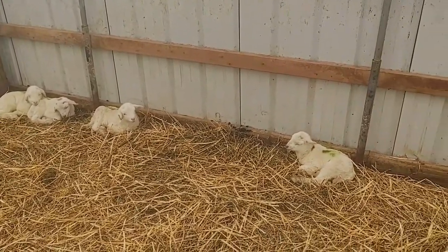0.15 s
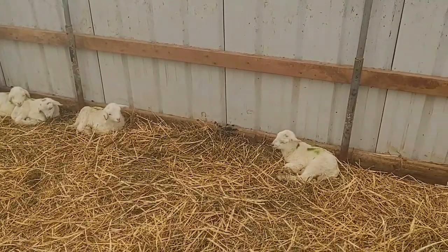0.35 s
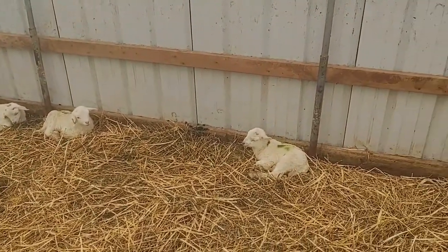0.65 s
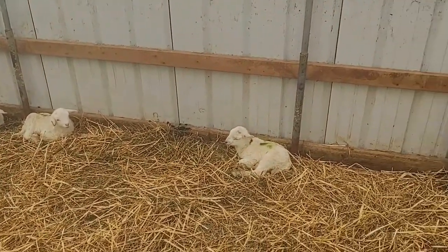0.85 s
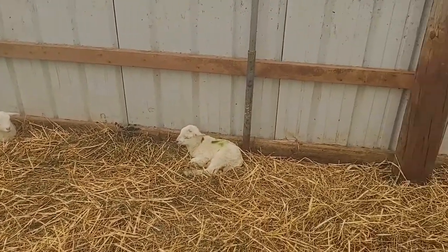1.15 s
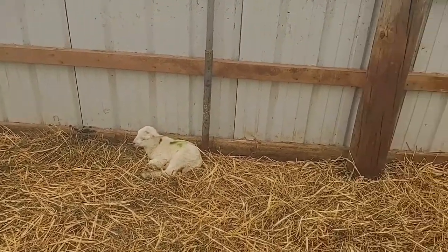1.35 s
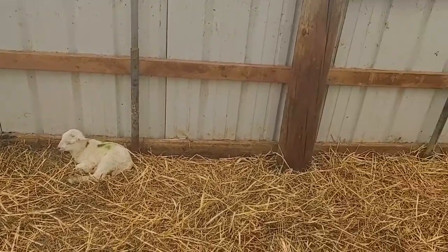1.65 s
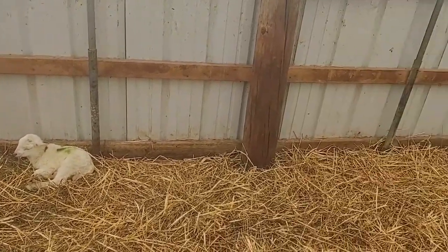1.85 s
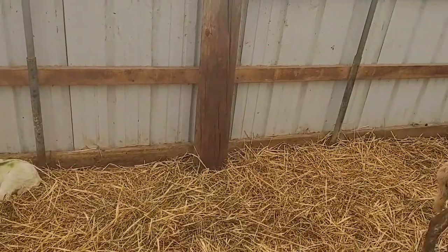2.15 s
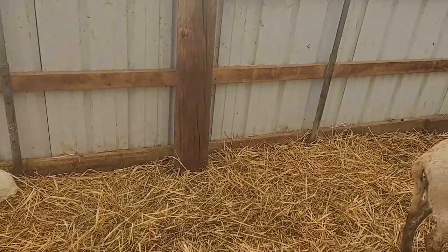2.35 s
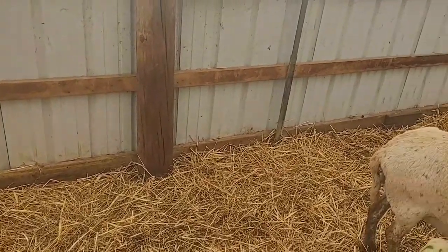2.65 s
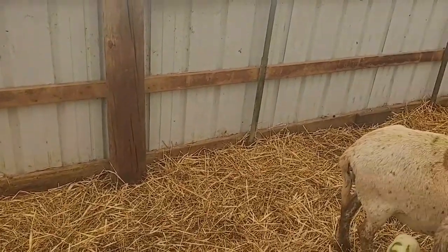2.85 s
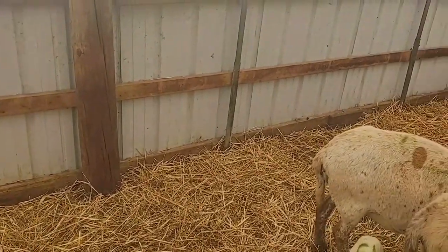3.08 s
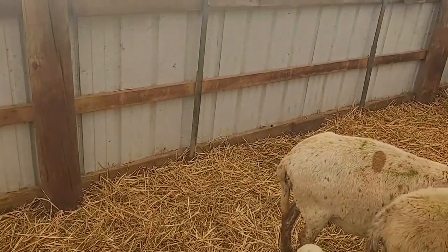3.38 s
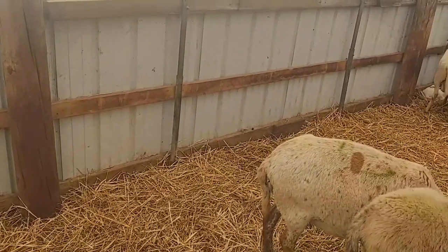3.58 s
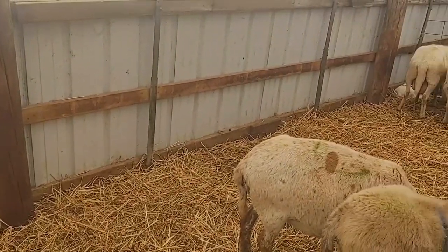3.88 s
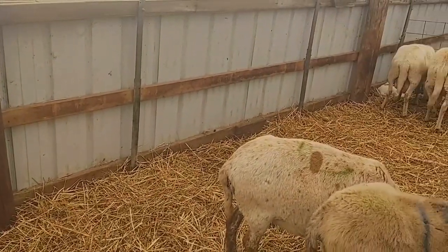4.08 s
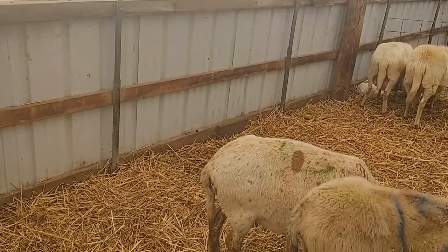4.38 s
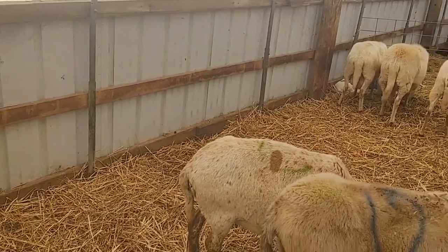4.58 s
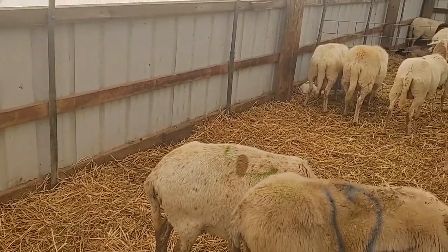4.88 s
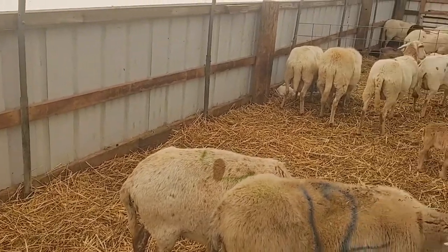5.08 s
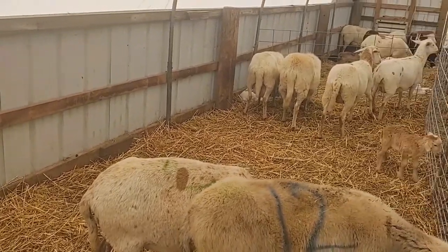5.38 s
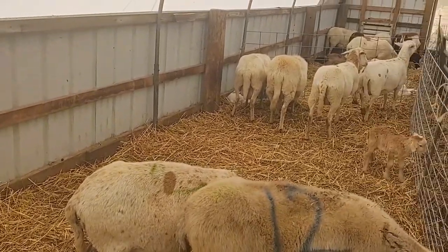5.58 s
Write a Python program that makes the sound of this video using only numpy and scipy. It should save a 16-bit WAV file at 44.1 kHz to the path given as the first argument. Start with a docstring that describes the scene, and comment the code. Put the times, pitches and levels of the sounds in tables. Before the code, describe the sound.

Inside a sheet-metal barn with straw bedding, a handheld phone picks up thin, bright stereo sound. Faint still air and a very low rumble lie underneath. From the start, footsteps brush and crush dry straw about twice a second, crisp and grainy, with a sharp stalk snap at 0.6 s. The steps are fullest from roughly 0.5 to 2.8 s, then lighter, with another small snap near 3.2 s and faint ticks around 4.7 and 5.4 s. At about 1.7 s a sheep makes a throbbing, creaky closed-mouth grumble that opens at 2.0 s into a loud, nasal, rasping bleat, fluttering at first and sharpening before stopping near 2.5 s, with short echoes. A softer grumble at 3.5 s leads to a brief, quavering, more distant bleat from 3.9 to 4.15 s. Steps continue, and at 5.5 s a third grumble swells into a rough call from about 5.7 s, just as things end.

```python
"""Sheep bleat in a sheet-metal barn while someone walks through the straw bedding with a phone.
Each call starts as a closed-mouth grumble of creaking vocal folds and opens into a rasping bleat, fold
pulses ringing in nose and throat: a loud near one, a softer quavering one further off, the start of a third.
Steps crush the straw throughout as shaped noise with a few snapping stalks, over still air and a low rumble."""
import sys
import numpy as np
from scipy import signal
from scipy.fft import rfft, irfft
from scipy.io import wavfile
from scipy.ndimage import uniform_filter1d

SR = 44100
rng = np.random.default_rng(int(sys.argv[2]) if len(sys.argv) > 2 else 0)


def generate_wav(signal):
    """Clip the signal to [-1, 1] and save it as 16-bit WAV at the path in sys.argv[1]."""
    frames = np.transpose(np.atleast_2d(signal))
    scaled = np.clip(frames, -1, 1) * 32767
    pcm = np.round(scaled).astype(np.int16)
    wavfile.write(sys.argv[1], SR, pcm)


N = 252693
TIME = np.arange(N) / SR


def undb(db):
    """Decibels to gain."""
    return 10 ** (np.asarray(db) / 20)


def curves(rows):
    """Each column of a table, joined by straight lines in time."""
    s, *columns = np.transpose(rows)
    return [np.interp(TIME, s, c) for c in columns]


def unit(x):
    """Scale to rms 1."""
    return x / np.sqrt(np.mean(x ** 2) + 1e-18)


def steady(x, seconds=0.36):
    """Scale to a running rms of 1, keeping the fast flutter."""
    power = np.abs(uniform_filter1d(x ** 2, int(seconds * SR)))
    return x / np.sqrt(power + 1e-18)


def gate(start, end, fade_s=0.0111):
    """1 while a sound lasts, with short fades."""
    fade_in = np.clip((TIME - start) / fade_s, 0, 1)
    return fade_in * np.clip((end - TIME) / fade_s + 1, 0, 1)


def walk(rate):
    """Smooth random drift, spread near 1, from fresh values drawn rate times a second."""
    k = int(SR / rate)
    held = np.repeat(rng.standard_normal(N // k + 1), k)
    return 1.22 * uniform_filter1d(uniform_filter1d(held, k), k)[:N]


def colour(x, points, share=1):
    """Filter by a spectrum of (frequency [Hz], level [dB]) points, its decibels scaled by share."""
    hz, db = np.transpose(points)
    f = np.arange(N + 1) * SR / (2 * N)
    gain = undb(share * np.interp(np.log(f + 1), np.log(hz), db))
    return irfft(rfft(x, 2 * N) * gain)[..., :N]


def resonate(x, hz, width):
    """A resonance applied twice, for steep skirts."""
    b, a = signal.iirpeak(min(hz, .45 * SR), hz / width, fs=SR)
    return signal.lfilter(b, a, signal.lfilter(b, a, x))


def throat(x, modes, order=2):
    """Resonances of the vocal tract as one causal filter; a higher order gives steeper skirts."""
    f = np.arange(1, 2050) * SR / 4096
    power = 0
    for hz, width, db in modes:
        detuning = (f / hz - hz / f) * hz / width
        power = power + undb(2 * db) / (1 + detuning ** 2) ** order
    # the folded cepstrum gives the minimum-phase response
    cepstrum = irfft(np.log(power + 1e-8))[:2048]
    cepstrum[0] /= 2
    response = irfft(np.exp(rfft(cepstrum, 4096)))
    return signal.oaconvolve(x, response)[:N]


# still air of the barn: (frequency [Hz], level per Hz [dB])
BARN_AIR = [(18, -45.5), (30, -8.5), (90, -9), (123, -7.5), (208, -9.5), (1450, -13), (1880, -13),
            (2440, -6.5), (3260, -11), (4830, -8), (6110, -9), (7340, -20), (9050, -17.5), (14100, -16.5),
            (15700, -6.5)]


def background(air_db=-61, rumble_db=-75, waver_db=2):
    """Still air of the barn with a low, wavering rumble that is alike at both ports."""
    air = unit(colour(rng.standard_normal((2, N)), BARN_AIR)) * undb(air_db)
    rumble = unit(throat(rng.standard_normal(N), [(118, 64, 1.5), (220, 300, -7)]))
    return air + rumble * undb(rumble_db + waver_db * walk(15))


# steps in the straw, about two a second, levels before each layer's trim: (heel down [s], pressing for [s],
# brushing beforehand for [s], crush [dB], crisp top [dB], dull crunch [dB])
STEPS = [(.19, 0.11, .19, -59.5, -54.5, -72), (.58, 0.14, 0.042, -52, -51, -82),
         (1.072, 0.19, 0.11, -51, -52.5, -80), (1.592, 0.14, 0.11, -51.5, -50.5, -67),
         (2.07, .44, 0.092, -49.5, -50.5, -50), (2.679, 0.14, 0.17, -49.5, -51, -52.5),
         (3.099, .16, 0.24, -56, -58, -60.5), (3.44, .14, 0.047, -55.5, -59.5, -80),
         (3.88, 0.098, 0.12, -62, -71, -62.5), (4.11, 0.083, 0.051, -57, -58.5, -73),
         (4.6, 0.14, .04, -65, -60.5, -82.5), (4.98, 0.2, 0.021, -58, -58, -66.5),
         (5.54, 0.13, 0.14, -58, -58, -62)]
# the weight comes on and lifts exponentially, with these time constants
STEP_RISE_S, STEP_FALL_S = .05, .042
# the swinging foot brushes the stalks, the heel lands, the load eases until the toe pushes off
BRUSH_DB, ROLL_DIP_DB = -5, -0.5


def footfalls():
    """Strength of crush, crisp top and dull crunch: each step brushes, presses from heel to toe and lifts."""
    def rise(start):
        return np.exp(np.minimum(TIME - start, 0) / STEP_RISE_S)

    power = 0
    for down, length, brushing, *db in STEPS:
        landing = np.maximum(rise(down), undb(BRUSH_DB) * rise(down - brushing))
        pressed = np.clip((TIME - down) / length, 0, 1)
        roll = undb(ROLL_DIP_DB * np.sin(np.pi * pressed) ** 2)
        lift = np.exp(-np.maximum(TIME - down - length, 0) / STEP_FALL_S)
        power = power + (undb(db)[:, None] * landing * roll * lift) ** 2
    return np.sqrt(power)


# rubbing and cracking stalks: (frequency [Hz], level per Hz [dB])
STRAW = [(290, -46), (500, -29.5), (658, -31), (877, -17), (1450, -21), (1830, -18), (2550, -11.5),
         (3350, -14.5), (4160, -12.5), (5550, -7), (6140, -2.5), (7960, -1.5), (9200, 0.5), (14000, -6),
         (15700, -9)]
# between steps the stalks keep settling, less and less; level before each layer's trim
SETTLING_DB, SETTLING_DB_PER_S = -64, -1


def straw(crackle_db=1.5, body_db=-3, crush_db=2, crisp_db=1, settling_top_db=-3):
    """Countless stalks rub and crack under each step; dry ones add a crisp top, packed bedding a duller crunch."""
    crush, crisp, weight = footfalls()
    settling = undb(SETTLING_DB + SETTLING_DB_PER_S * TIME)
    noise = rng.standard_normal((2, N))
    # a new random strength every 16 samples makes the noise grainy
    strength = np.repeat(rng.exponential(size=N // 16 + 1), 16)[:N].clip(0, 5)
    rustle = unit(colour(noise * undb(crackle_db * strength), STRAW))
    body = signal.sosfiltfilt(signal.butter(4, 5500, fs=SR, output="sos"), rustle)
    top = signal.sosfiltfilt(signal.butter(4, 11500, "high", fs=SR, output="sos"), rustle)
    middle = rustle - body - top
    patchy_db = 1.3 * walk(7)
    flicker_db = .9 * walk(60) + 1.1 * walk(18)
    crushed = body * undb(body_db + patchy_db) + middle
    crushing = unit(crushed) * np.hypot(crush, settling) * undb(crush_db)
    crackling = unit(top) * np.hypot(crisp, settling * undb(settling_top_db)) * undb(crisp_db)
    crunch = colour(rng.standard_normal((2, N)), [(60, -14), (150, -3.5), (500, -6.5), (1500, 0),
                                                  (3200, 7), (5500, -4), (6400, 6.5), (8500, -22)])
    return (crushing + crackling + unit(crunch) * weight) * undb(flicker_db)


# single stalks snapping: (time [s], peak level [dB], pitch [Hz])
SNAPS = [(0.6013, -29, 9800), (1.2284, -72, 10300), (3.2454, -32, 8750), (4.6398, -44, 11920),
         (4.7124, -39, 11500), (4.7855, -45.5, 11940), (5.4286, -44.5, 9170)]


def snaps(ring_s=0.0018, width_hz=7000):
    """A stalk breaks with a short bright tick: a dying noise burst through a broad resonance."""
    out = np.zeros((2, N))
    for s, db, hz in SNAPS:
        decay = np.exp(-np.abs(TIME - s) / ring_s) * (TIME >= s)
        tick = resonate(rng.standard_normal((2, N)) * decay, hz, width_hz)
        out += tick / np.abs(tick).max() * undb(db)
    return out


def folds(hz, rough, jitter, shimmer_db, rasp, limp_db=0):
    """Vocal folds: a click per closure, uneven, alternately strong and weak, each with a burst of turbulence."""
    phase = np.cumsum(hz) / SR
    chance = rng.standard_normal((2048, 2))
    cycle = np.arange(1, int(phase[-1]) - 1)
    unsteady = np.interp(cycle, phase, rough)
    # jitter is in cycles, shimmer and limp in dB, all in proportion to the roughness
    jittered = cycle + jitter * unsteady * chance[cycle, 0]
    at = np.sort(np.interp(jittered, phase, np.arange(N)).clip(0, N - 2))
    size = undb(unsteady * (shimmer_db * np.tanh(chance[cycle, 1]) + limp_db * (cycle % 2)))
    # each click is shared between its two nearest samples
    whole, part = at.astype(int), at % 1
    clicks = np.bincount(whole, size * (1 - part), N) + np.bincount(whole + 1, size * part, N)
    fade = np.exp(-1 / (0.0017 * SR))
    bursts = signal.lfilter([1], [1, -fade], clicks)
    air = unit(bursts * rng.standard_normal(N))
    return unit(clicks), rasp * rough * air


def barn(x, wet_db, t60=0.2, tail_db=-31, tail_t60=0.94):
    """Near metal walls give dense early echoes; the straw soaks up all but a faint tail."""
    t = TIME[:SR]
    early, tail = undb(-60 * t / t60), undb(tail_db) * undb(-60 * t / tail_t60)
    decay = (early + tail) * np.clip(t / 0.0053 - .5, 0, 1)
    echoes = rng.standard_normal((3, SR)) * decay / np.sqrt(np.sum(decay ** 2))
    wet = signal.fftconvolve(x[None], echoes, axes=1)[:, :N]
    # long waves reach both ports alike
    shared = signal.sosfilt(signal.butter(2, 700, fs=SR, output="sos"), wet[2])
    apart = signal.sosfilt(signal.butter(2, 700, "high", fs=SR, output="sos"), wet[:2])
    return undb(wet_db) * (0.75 * shared + apart)


# a grumble comes in throbs, the first just after its start
THROB_HZ, THROB_LAG_S, THROB_DB = 9.64, 0.037, 5


def grumble(start, end, nasal, throaty, ring, growth, ring_growth,
            nose_hz, nose_width_hz, pulse_hz, creak, wet_db=-2):
    """Mouth shut, the folds creak in slow, irregular pulses through nose and throat; they throb and grow."""
    to_go = np.clip((end - TIME) / (end - start), 0, 1)
    throb = THROB_DB * np.sqrt(to_go) * np.cos(2 * np.pi * THROB_HZ * (TIME - start - THROB_LAG_S))
    clicks, air = folds(np.full(N, pulse_hz), np.ones(N), jitter=0.21, shimmer_db=4.5, rasp=1.0)
    # turbulence at the slack folds fills the gaps between the pulses
    hoarse = creak * (clicks + air) + rng.standard_normal(N)
    nose = steady(resonate(hoarse, nose_hz, nose_width_hz))
    vowel = steady(throat(hoarse, [(560, 250, -2), (950, 870, 0.5), (1400, 500, -13.5)]))
    bright = steady(throat(creak * clicks + .4 * hoarse, [(2490, 1200, 0.0074)], order=6))
    sound = nose * undb(nasal - growth * to_go)
    sound += vowel * undb(throaty - 1.2 * growth * to_go)
    sound += bright * undb(ring - ring_growth * to_go)
    sound *= gate(start, end) * undb(throb)
    return sound + barn(sound, wet_db)


def place(x, lag_ms):
    """The sound reaches the left port lag_ms after the right."""
    return np.array([np.interp(TIME - lag_ms / 1000, TIME, x), x])


ATTACK_DB, SWELL_S = 15, .13
RELEASE_S, MOUTH_FALL_DB_PER_S, RING_FALL_DB_PER_S = .06, 142.5, 289


def bleat(row, hz, rough, nose_modes, mouth_modes, ring_modes, edge_modes, hum_quaver_db, mouth_quaver_db,
          flutter_db, flutter_s, vibrato, push, hum_fall, jitter, shimmer_db, limp_db, rasp,
          wet_db, ring_wet_db, lag_ms):
    """Fold pulses sound through nose and throat; effort swells and lets go, a quaver shakes pitch and level."""
    start, end, attack_s, hum, mouth, ring, edge, swell, quaver_hz, crest = row
    age, over = np.maximum(TIME - start, 0), np.maximum(TIME - end, 0)
    attack = ATTACK_DB * np.clip((TIME - start) / attack_s, -1, 0)
    effort = attack - swell * np.exp(-age / SWELL_S)
    quaver = np.cos(2 * np.pi * quaver_hz * (TIME - crest))
    flutter = flutter_db * quaver * np.exp(-age / flutter_s)
    clicks, air = folds(hz * (1 + vibrato * quaver), np.clip(rough * np.ones(N), 0, 1),
                        jitter, shimmer_db, rasp, limp_db)
    # levels in dB: effort weighs most on the raspy edge, least on the nose
    nose_db = hum + 0.69 * effort + hum_quaver_db * quaver - hum_fall * over
    vowel_db = mouth + 1.4 * effort + mouth_quaver_db * quaver - MOUTH_FALL_DB_PER_S * over
    bright_db = ring + 1.27 * effort + flutter - RING_FALL_DB_PER_S * over
    rasping_db = edge + 2.1 * effort + flutter + push - 2.7 * RING_FALL_DB_PER_S * over
    nose = steady(throat(clicks + 2 * air, nose_modes)) * undb(nose_db)
    vowel = steady(throat(clicks + .9 * air, mouth_modes)) * undb(vowel_db)
    bright = steady(throat(clicks + .5 * air, ring_modes, order=6)) * undb(bright_db)
    rasping = steady(throat(clicks + 4 * air, edge_modes)) * undb(rasping_db)
    # the low nasal hum sends only half its strength into the echo; the ring is beamed and has its own share
    spread = .5 * nose + vowel + rasping + undb(ring_wet_db) * bright
    voiced = gate(start - attack_s, end + RELEASE_S)
    return place(voiced * (nose + vowel + bright + rasping), lag_ms) + barn(voiced * spread, wet_db)


# closed-mouth grumbles that grow into the bleats, levels at their end: (start [s], end [s], nasal [dB],
# throaty [dB], ring [dB], growth [dB], ring growth [dB], nose [Hz], nose width [Hz], pulses [Hz], creak [0-1])
GRUMBLES = [(1.667, 2.002, -49.5, -58.5, -48.5, 26, 30.5, 176, 68, 80, 0.77),
            (3.494, 3.896, -58, -59.5, -59.5, 9, 17.5, 196, 151, 109.6, 0.25),
            (5.495, 5.762, -56.5, -64, -46.5, 16, 39.5, 179, 86, 79.9, 0.37)]
# bleats, loud, soft and late, levels before effort and quaver: (full voice from [s], letting go at [s],
# attack [s], nasal hum [dB], open mouth [dB], bright ring [dB], raspy edge [dB], swell [dB],
# quaver [Hz], a quaver crest [s])
BLEATS = [(2.028, 2.49, 0.049, -49, -34, -19.5, -38, 7, 11.96, 1.934),
          (3.915, 4.135, 0.048, -54, -42.5, -35.5, -59, 2.5, 11.5, 4.017),
          (5.715, 5.95, .045, -53.5, -38.5, -27.5, -35.5, 9, 8.8, 5.735)]
# vocal folds in the loud call: (time [s], pitch [Hz], roughness [0-1])
LOUD_FOLDS = [(2.0, 146, 0.7), (2.04, 147.6, 0.33), (2.09, 130.6, .55), (2.156, 127.1, .55),
              (2.262, 153.2, 0.46), (2.3, 148, .33), (2.336, 151.7, 0.4), (2.462, 148.9, 0.14),
              (2.51, 133.8, 0.27), (2.545, 124.6, 0.48)]
# resonances of nose, open mouth, bright ring and raspy edge, the late mouth half open:
# (frequency [Hz], width [Hz], level [dB])
LOUD_NOSE = [(167, 150, -3.5), (345, 157, -5.5)]
SOFT_NOSE = [(197, 160, -0.14), (312, 65, -0.91)]
LOUD_MOUTH = [(622, 79, 5.5), (795, 260, -2.5), (1050, 397, -9), (1492, 230, 1), (1900, 400, -2)]
SOFT_MOUTH = [(468, 99, -20), (599, 110, 14), (762, 200, 7.5), (1100, 420, -4.5), (1426, 77, 12),
              (1620, 900, 0)]
LATE_MOUTH = [(496, 220, 3), (1490, 2300, -8.5)]
LOUD_RING = [(2404, 610, 5), (2547, 880, 0.5)]
SOFT_RING = [(2485, 960, 10), (2540, 1240, -7)]
LATE_RING = [(2458, 310, 7)]
LOUD_EDGE = [(3240, 780, 0), (4170, 560, 3.5), (4790, 650, 3), (6180, 1400, 1), (9500, 2700, -13.5),
             (13650, 6000, -17.5)]
SOFT_EDGE = [(3810, 300, -1), (4560, 120, -0.5), (6200, 1300, -27)]
# the soft and late calls hold their pitch, apart from the quaver
SOFT_HZ, SOFT_ROUGH, LATE_HZ, LATE_ROUGH = 155.25, 0.19, 124.34, 0.48
HUM_FALL_DB_PER_S = 160
# the last push of the loud call sharpens its edge
PUSH_S, PUSH_WIDTH_S, PUSH_DB = 2.485, .07, 10


def sheep():
    """Three calls, each led in by a grumble: the loud one flutters as it opens, the soft quavers throughout."""
    hz, rough = curves(LOUD_FOLDS)
    push = PUSH_DB * np.exp(-((TIME - PUSH_S) / PUSH_WIDTH_S) ** 2)
    loud = bleat(BLEATS[0], hz, rough, LOUD_NOSE, LOUD_MOUTH, LOUD_RING, LOUD_EDGE,
                 hum_quaver_db=3.5, mouth_quaver_db=2.15, flutter_db=5.5, flutter_s=.1, vibrato=.008,
                 push=push, hum_fall=0, jitter=.1, shimmer_db=6, limp_db=2.5, rasp=1.0,
                 wet_db=-0.5, ring_wet_db=-3, lag_ms=-.449)
    soft = bleat(BLEATS[1], SOFT_HZ, SOFT_ROUGH, SOFT_NOSE, SOFT_MOUTH, SOFT_RING, SOFT_EDGE,
                 hum_quaver_db=8, mouth_quaver_db=2.0, flutter_db=1.0, flutter_s=.6, vibrato=0.0208,
                 push=0, hum_fall=HUM_FALL_DB_PER_S, jitter=0.097, shimmer_db=9, limp_db=8, rasp=1.95,
                 wet_db=-4, ring_wet_db=2.0, lag_ms=.2)
    late = bleat(BLEATS[2], LATE_HZ, LATE_ROUGH, LOUD_NOSE, LATE_MOUTH, LATE_RING, SOFT_EDGE,
                 hum_quaver_db=0.0, mouth_quaver_db=-3, flutter_db=3.5, flutter_s=.2, vibrato=0.0024,
                 push=0, hum_fall=HUM_FALL_DB_PER_S, jitter=0.085, shimmer_db=4, limp_db=14, rasp=0.44,
                 wet_db=3.5, ring_wet_db=4.5, lag_ms=-0.3)
    return loud + soft + late + sum(grumble(*row) for row in GRUMBLES)


def scene():
    """Sheep, steps in the straw and the quiet barn."""
    return sheep() + straw() + snaps() + background()


# the two microphone ports differ in colour: (frequency [Hz], left minus right before sharing out [dB])
PORTS = [(200, 1), (700, 1.5), (1300, -2), (1800, -2.5), (2400, -12.5), (3000, -6.5), (3700, -1), (6300, 1),
         (9000, -11.5), (15000, -10)]
TOP_HZ = 15500


def record(dry, ceiling=.8, low_cut_hz=55):
    """The phone thins the bass, is brighter at its right port, rounds the loudest peaks and cuts the top."""
    thin = signal.sosfilt(signal.butter(2, low_cut_hz, "high", fs=SR, output="sos"), dry)
    ports = np.array([colour(thin[0], PORTS, 0.64), colour(thin[1], PORTS, -0.33)])
    rounded = ports / (1 + (ports / ceiling) ** 6) ** (1 / 6)
    return signal.sosfilt(signal.ellip(10, .2, 80, TOP_HZ, fs=SR, output="sos"), rounded)


dry = scene()
out = record(dry)
generate_wav(out)
```